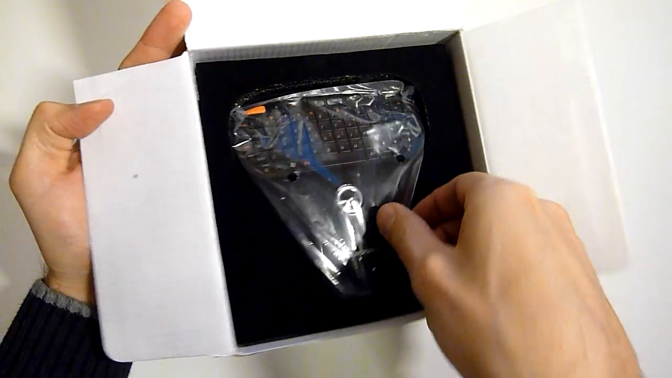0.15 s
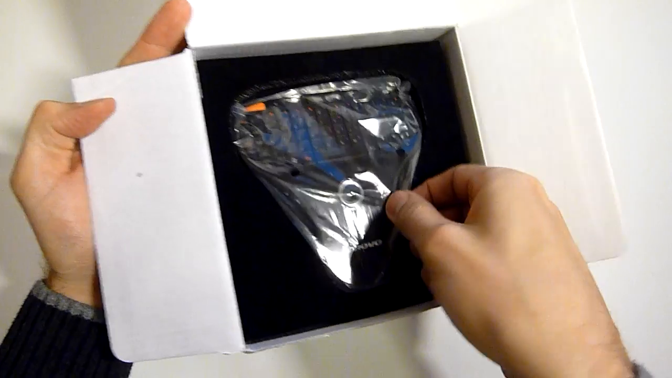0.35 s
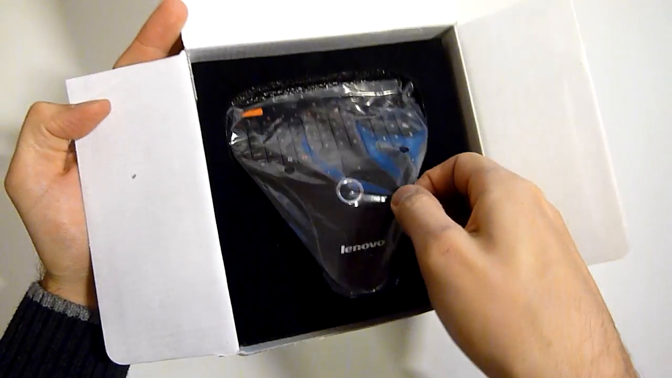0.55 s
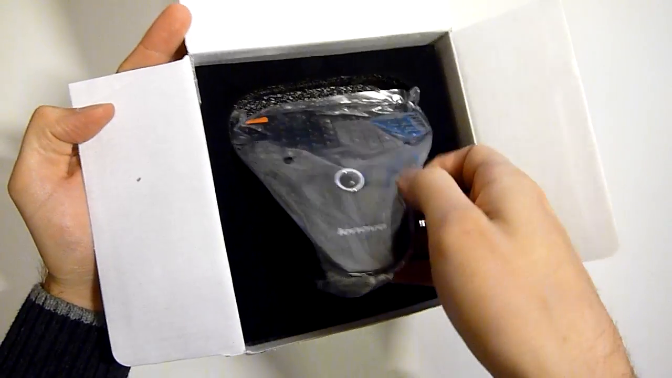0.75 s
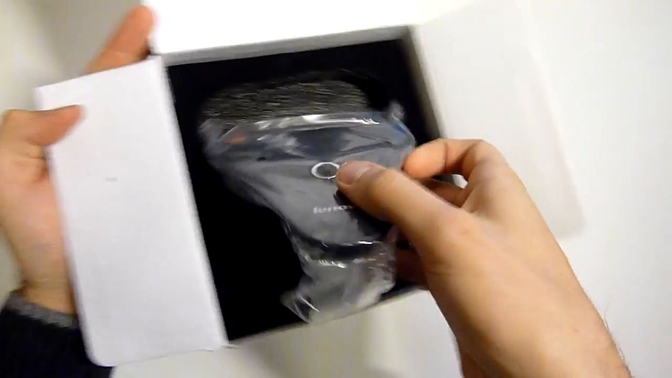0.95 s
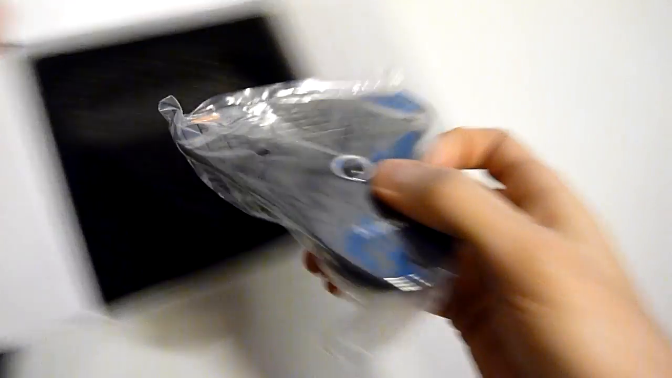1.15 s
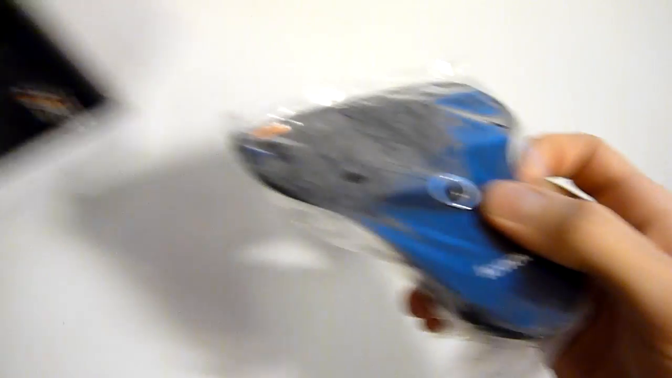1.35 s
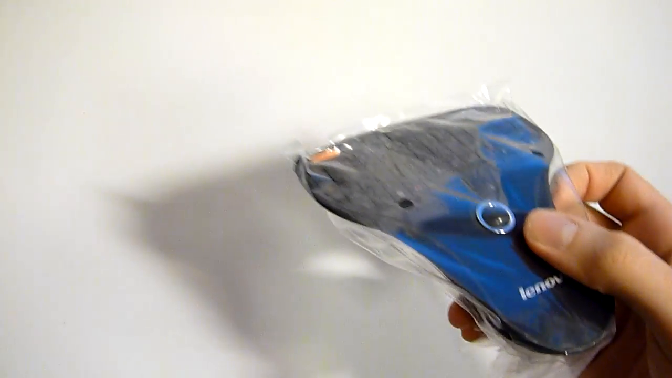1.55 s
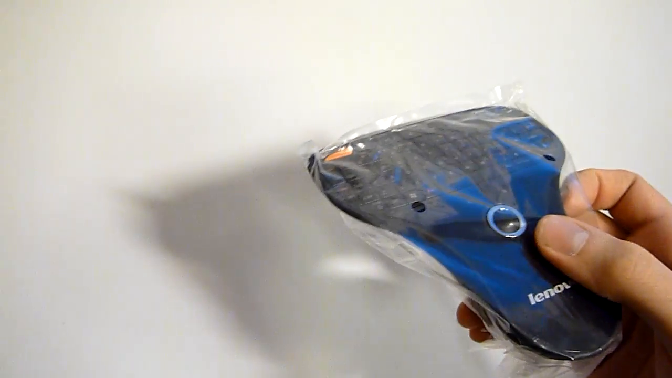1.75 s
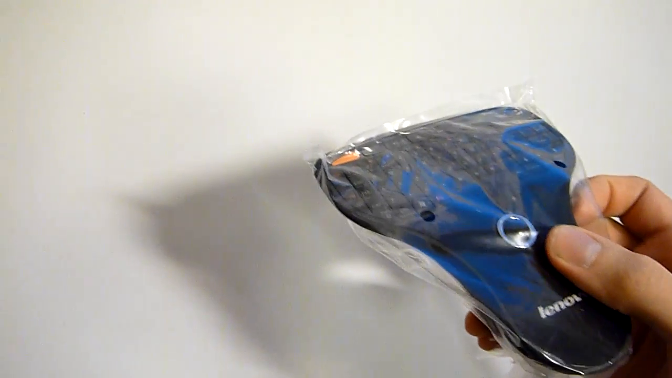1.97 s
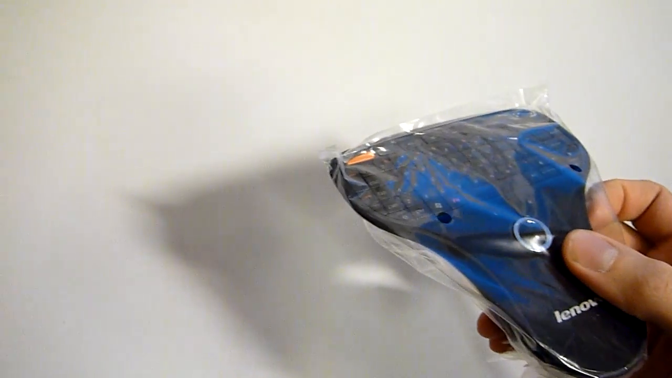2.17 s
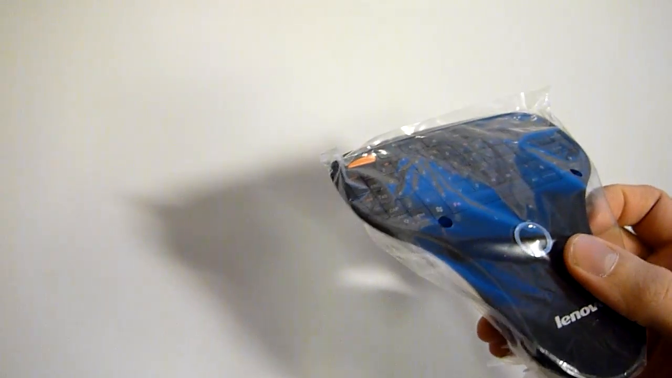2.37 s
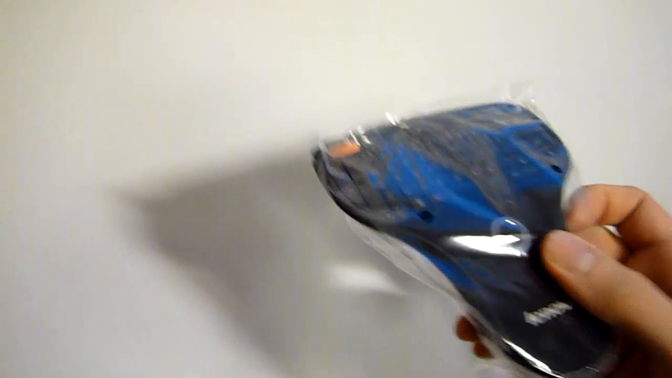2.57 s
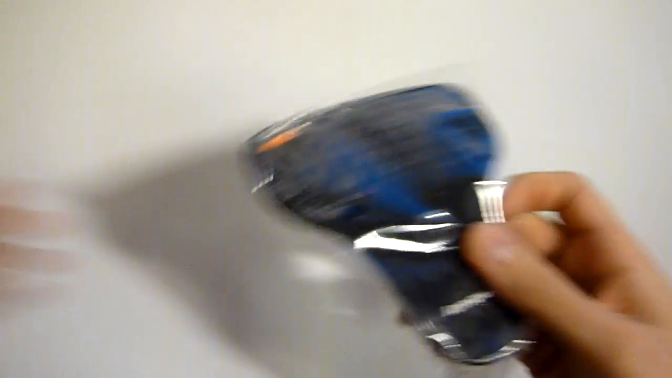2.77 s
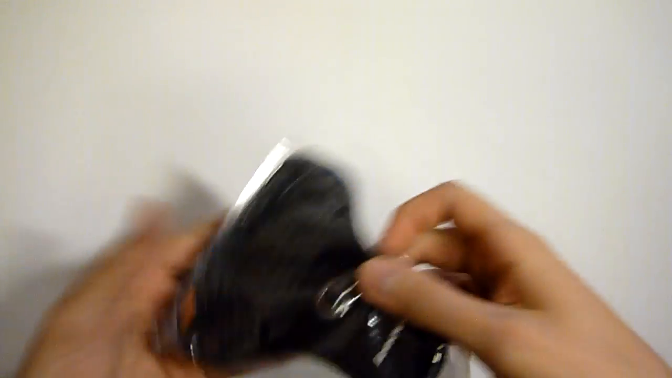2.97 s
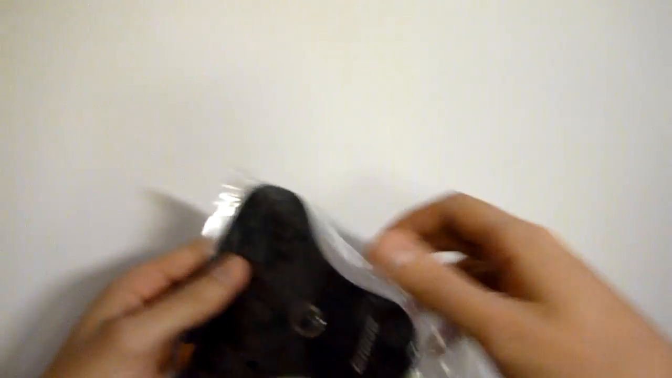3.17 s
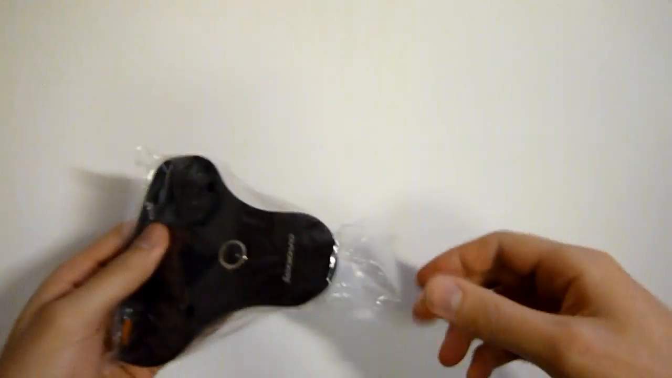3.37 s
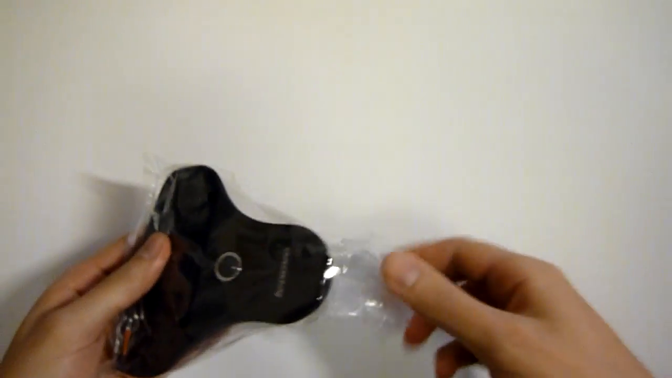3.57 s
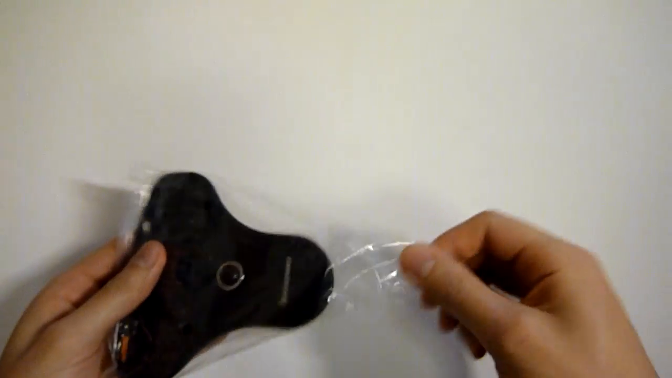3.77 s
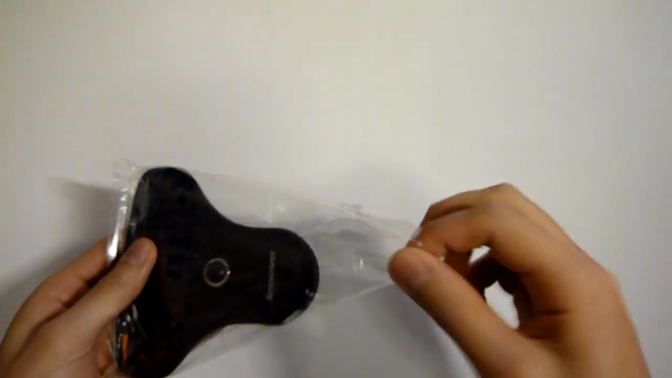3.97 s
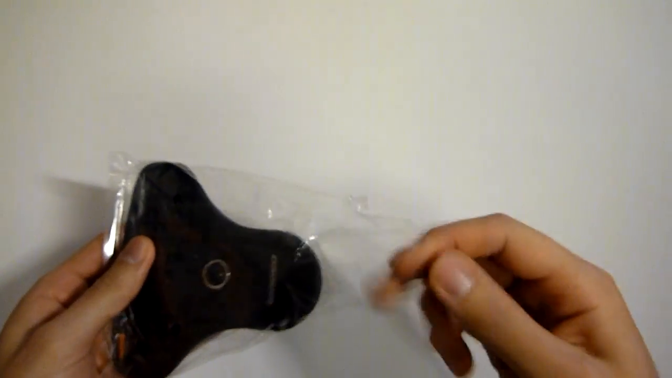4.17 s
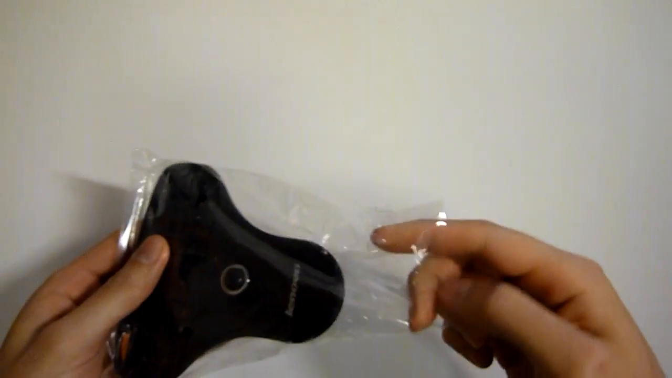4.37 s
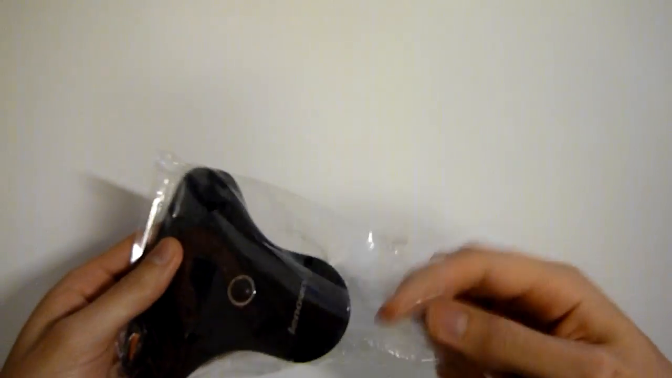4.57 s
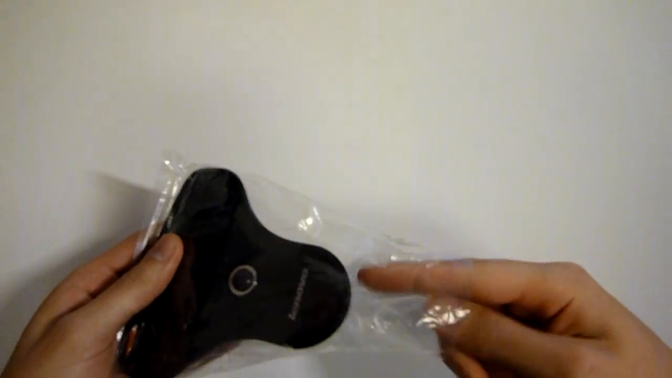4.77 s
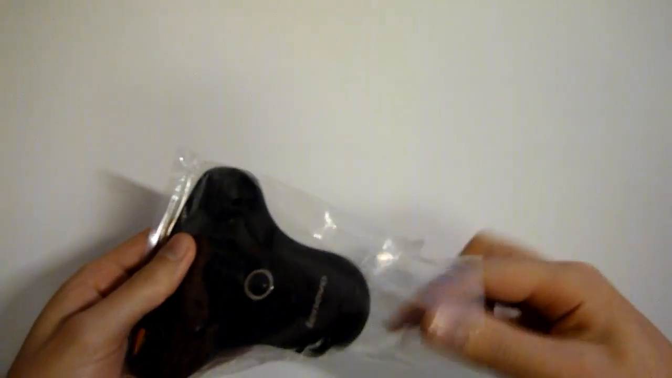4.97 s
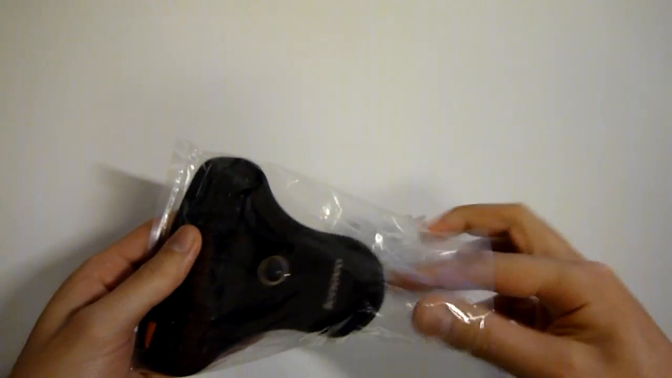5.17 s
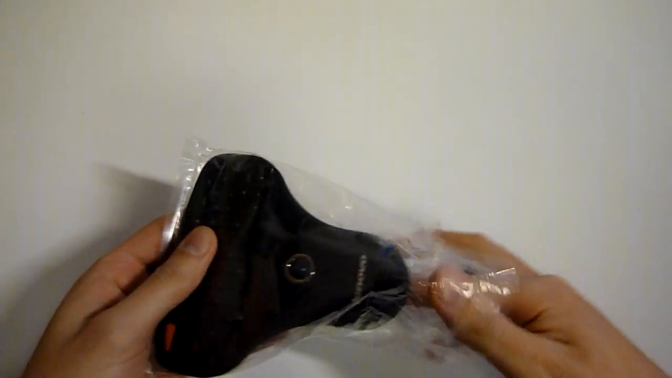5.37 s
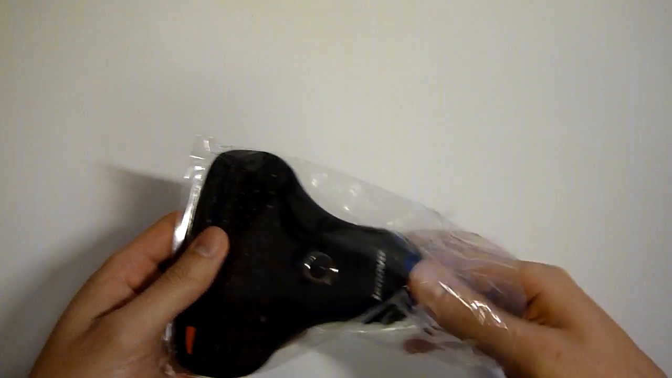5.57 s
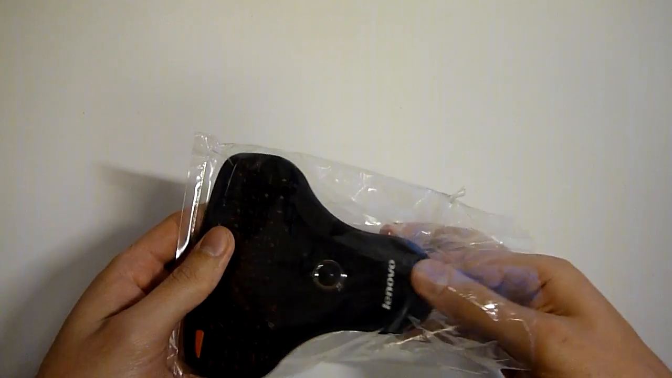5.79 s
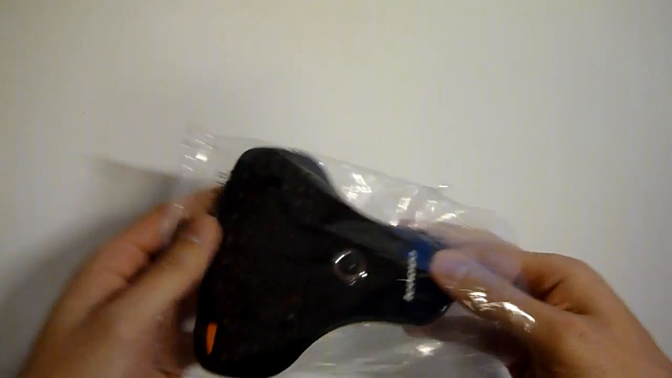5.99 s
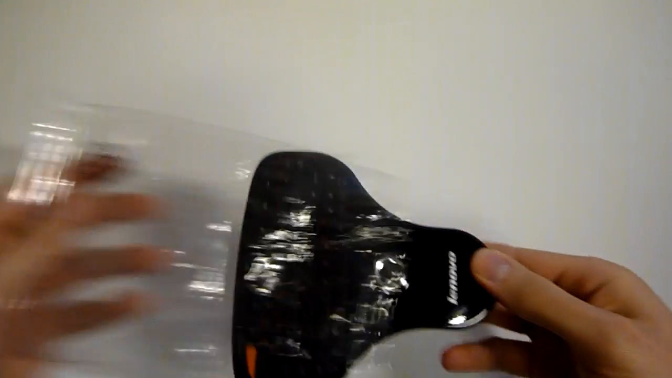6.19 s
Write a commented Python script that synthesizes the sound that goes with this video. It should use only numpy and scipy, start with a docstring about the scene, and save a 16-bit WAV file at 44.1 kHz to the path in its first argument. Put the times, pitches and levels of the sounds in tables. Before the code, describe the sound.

In a small quiet room, fingers grip a plastic-wrapped small keyboard in a cardboard box, making crisp crinkles and light scrapes. The rustling thins out, then the box lands with a hollow double knock and small bumps. After a near-quiet second, the bag is worked open with sharp, bright crackling bursts. Close stereo microphones, steady faint hiss.

```python
"""In a small, quiet room, a cardboard box is slid about and set down, and a small keyboard in a clear
plastic bag is lifted out and its bag worked open, at arm's length from two close microphones.
Each squeeze of the film is a swarm of tiny filtered noise bursts; single bursts are creases that snap
and two dull taps on the box. Knocks are noise thuds, rattles and ringing sines; scrapes and a brushing
hand are shaped noise. A short tail from the walls and a steady hiss complete the sound."""
import sys
import numpy as np
from scipy import signal
from scipy.fft import rfft, irfft, next_fast_len
from scipy.io import wavfile
from scipy.ndimage import uniform_filter1d

SR = 44100
rng = np.random.default_rng(int(sys.argv[2]) if len(sys.argv) > 2 else 0)


def wrap_up_sound(samples):
    """Save the sound to the file named by the first command line argument, as 16-bit audio."""
    columns = np.atleast_2d(samples).T
    # keep every value between -1 and 1, then stretch to whole-number steps
    tamed = np.clip(columns, -1, 1)
    steps = np.round(tamed * 32767).astype(np.int16)
    wavfile.write(sys.argv[1], SR, steps)


N = 274897  # length of the scene in samples


def undb(db):
    """Turn decibels into a gain."""
    return 10 ** (np.asarray(db) / 20)


def unit(x):
    """Scale a sound to an average (rms) level of 1."""
    return x / np.sqrt(np.mean(x ** 2) + 1e-20)


def freqs(size):
    """Frequencies in Hz of the bins of a real transform, never below 1."""
    return np.maximum(np.fft.rfftfreq(size, 1 / SR), 1)


def shape(points, f):
    """Read the level in dB at f from a curve of (f/Hz, level/dB) points."""
    hz, db = np.transpose(points)
    return np.interp(np.log(f), np.log(hz), db)


def colour(x, db):
    """Filter a sound to the given dB at each bin, with no sound before its cause (minimum phase)."""
    size = len(x)
    cepstrum = irfft(db * np.log(10) / 20, size)
    # folding the second half onto the first makes the filter act only forwards in time
    cepstrum[1:size // 2] *= 2
    cepstrum[size // 2 + 1:] = 0
    response = np.exp(rfft(cepstrum))
    return irfft(rfft(x) * response, size)


def paint(x, points):
    """Filter a long sound by a curve of (f/Hz, level/dB) points."""
    size = 2 * next_fast_len(len(x) // 2 + 2048)
    padded = np.pad(x, (0, size - len(x)))
    return colour(padded, shape(points, freqs(size)))[:len(x)]


def bump(f, hz, q, height_db):
    """A resonance standing out of a flat spectrum, in dB."""
    detuning = q * (f / hz - hz / f)
    return 10 * np.log10(1 + undb(height_db) ** 2 / (1 + detuning ** 2))


def add(track, s, sound):
    """Mix a sound into a track at time s in seconds."""
    i = max(int(s * SR), 0)
    part = sound[..., :max(N - i, 0)]
    track[..., i:i + part.shape[-1]] += part


def place(x, pan_db):
    """Make two channels, the left louder than the right by pan_db."""
    return x * undb(np.array([pan_db, -pan_db]).reshape(2, -1) / 2)


def from_left(x, pan_db=2.5):
    """The box lies to the left: louder there, and one sample sooner."""
    return place(np.array([x, np.roll(x, 1)]), pan_db)


def noise_pair(size, apart_hz):
    """Noise from all round: alike at both microphones in the bass, unrelated in the treble."""
    mid, side = rfft(rng.standard_normal((2, size)))
    alike = .97 / (1 + (freqs(size) / apart_hz) ** 2)
    mid = mid * np.sqrt((1 + alike) / 2)
    side = side * np.sqrt((1 - alike) / 2)
    return irfft(np.array([mid + side, mid - side]), size)


# tone of the still room and microphone hiss: (f/Hz, level/dB)
HISS_TONE = [(15, -34), (25, -20), (123, -8), (394, -4.5), (476, -8.5), (575, -6), (1040, -10.5),
             (1440, -13.5), (2350, -14), (14400, -25), (16000, -68)]


def floor(db=-51.0):
    """Steady air noise shared in part by both microphones, plus each microphone's own hiss."""
    air = noise_pair(2 * next_fast_len(N // 2 + 1), 650)[:, :N]
    noise = air + rng.standard_normal((2, N))
    return undb(db) * unit(np.array([paint(c, HISS_TONE) for c in noise]))


# cardboard sliding, or a fingertip dragging over the film:
# (middle t/s, half length t/s, level/dB at the middle, main resonance f/Hz)
SCRAPES = [(.005, 0.0095, -43.5, 1250), (0.102, 0.0174, -37, 1400), (0.196, 0.029, -37, 600),
           (2.002, .019, -34.5, 1136), (2.083, 0.032, -47.5, 1023), (2.373, 0.0217, -48, 970),
           (5.132, .004, -33.5, 1150), (5.392, 0.017, -39, 1270)]
# tone of the grain of sliding cardboard: (f/Hz, level/dB)
CARD_TONE = [(100, -39), (400, -11.5), (650, -6), (1000, -8.5), (1470, -3), (1950, -10.5), (2300, -6),
             (3000, -12), (6000, -14), (15000, -22)]


def scrapes(q=6, ring_db=11, size=8192):
    """The surface catches and slips in dense grains that swell and fade and excite one panel."""
    out, t, f = np.zeros(N), np.arange(size) / SR, freqs(size)
    for s, half_s, db, hz in SCRAPES:
        start = max(s - size / SR / 2, 0)
        # random single-sample slips, about 6000 a second
        slips = rng.standard_normal(size) * (rng.random(size) < 6000 / SR)
        grain = unit(colour(slips, shape(CARD_TONE, f) + bump(f, hz, q, ring_db)))
        swell = 1 / (1 + ((t + start - s) / half_s) ** 4)
        add(out, start, grain * undb(db) * swell)
    return out


# blows on the box: (start t/s, level/dB of the blow over 20 ms, softness cut-off f/Hz,
# t/s for the rattle to fall 60 dB (if negative it grows), level/dB of the table's ring)
KNOCKS = [(0.1095, -34.5, 695, 9.75, -48.5), (1.633, -19.5, 2700, 0.28, -35.5),
          (1.651, -27.5, 2610, 0.1, -50), (1.727, -39.5, 370, 0.25, -55), (1.752, -34, 237, -1.1, -44.5),
          (1.815, -40.5, 800, -12.28, -48), (1.945, -48, 600, -1, -57.5), (2.004, -42, 444, -1.5, -34)]
# notes the box rings with: (f/Hz, level/dB, t/s to fall 60 dB)
BOX_RINGS = [(230, -2.5, 0.081), (315.3, -16, 0.87), (419, 6, 0.049), (487.8, 0.5, 0.177),
             (536, 3.5, 0.084), (725, 6, 0.056), (771, 7, 0.089), (1140, -1, 0.12), (1247, 4.5, 0.055),
             (1550, -1.5, 0.06), (1827, 5, 0.054), (2180, 1, 0.088), (3547, -7, 0.09)]


def knocks(ring_db=-1, rattle_db=-5, thud_s=0.002, table_hz=157, table_t60=0.337, size=16384):
    """Each blow thuds, rattles the flaps and rings box and table; a softer contact dulls the blow."""
    out, t, f = np.zeros(N), np.arange(size) / SR, freqs(size)
    panel = shape([(100, -4.5), (200, -9.5), (400, -3), (800, 2), (1200, 0), (2200, -11),
                   (3700, -12), (4800, -20.5), (14000, -6)], f)
    table_fade = undb(-60 * t / table_t60) * (1 - np.exp(-t * table_hz))
    table = np.sin(2 * np.pi * table_hz * t) * table_fade
    # a small box radiates hardly any deep bass
    small_box = signal.butter(4, 110, "high", fs=SR, output="sos")
    for s, db, cut_hz, t60, table_db in KNOCKS:
        ring = np.zeros(size)
        for hz, level_db, life_s in BOX_RINGS:
            sign = rng.choice([-1, 1])
            ring += sign * undb(level_db - 60 * t / life_s) * np.sin(2 * np.pi * hz * t)
        rattle = colour(rng.standard_normal(size) * undb(-60 * t / t60), panel)
        thud = colour(rng.standard_normal(size) * np.exp(-t / thud_s), panel)
        blow = unit(thud) + undb(rattle_db) * unit(rattle) + undb(ring_db) * unit(ring)
        softness = -10 * np.log10(1 + (f / cut_hz) ** 4)
        blow = signal.sosfilt(small_box, colour(blow, softness))
        # give the blow the energy of 20 ms at its level
        blow *= undb(db) * np.sqrt(.02 * SR) / np.linalg.norm(blow)
        add(out, s, blow + undb(table_db) * table)
    return out


# the film is squeezed, pulled or jolted: (middle of the build-up t/s, hold t/s,
# level/dB of the crackle before weak squeezes are made weaker and the layers are balanced)
SQUEEZES = [(0.169, 0.084, -53), (0.36, 0.074, -48.5), (0.453, 0.053, -36), (0.594, 0.067, -39),
            (0.753, 0.092, -46.5), (0.844, 0.1183, -38), (1.09, 0.134, -64.5), (1.647, 0.009, -41),
            (1.83, 0.16, -56.5), (2.357, 0.01, -45.5), (2.691, 0.184, -57.5), (3.038, 0.052, -41),
            (3.14, 0.092, -44), (3.285, 0.0106, -50.5), (3.428, 0.013, -46), (3.578, 0.15, -37.5),
            (3.68, 0.0817, -29.5), (3.856, 0.021, -31), (3.92, 0.072, -42), (4.039, 0.16, -41.5),
            (4.151, 0.031, -24), (4.239, 0.08, -40), (4.418, 0.013, -28.5), (4.51, 0.024, -30),
            (4.59, .06, -36), (4.661, 0.0268, -29.5), (4.816, 0.12, -37), (4.938, 0.043, -33.5),
            (5.135, 0.251, -42), (5.253, 0.027, -33.5), (5.333, 0.047, -33.5), (5.451, 0.0589, -39),
            (5.55, .1, -47.5), (5.724, 0.084, -43), (5.875, 0.055, -48), (5.959, 0.09, -36),
            (6.074, 0.1434, -34)]
# each squeeze builds up, holds and dies away; the held bag never rests entirely
ATTACK_S, RELEASE_DB_PER_S, REST_DB = 0.036, 318.5, -65.5


def effort(step_s=0.002):
    """Level of the crackle in dB: squeezes with attack, hold and release, over the resting bag."""
    t = np.arange(0, N / SR, step_s)
    s, held_s, db = np.transpose(SQUEEZES)[:, :, None]
    attack = np.clip((t - s) / ATTACK_S + .5, 0, 1)
    release_db = RELEASE_DB_PER_S * np.clip(t - s - held_s, 0, 1)
    power = np.sum((attack * undb(db - release_db)) ** 2, axis=0) + undb(REST_DB) ** 2
    return np.interp(np.arange(N) / SR, t, 10 * np.log10(power))


def buckling(db):
    """Gain of the buckles: a film that is barely moved hardly buckles at all."""
    return undb(db) / (1 + undb(-57 - db) ** 2)


def swarm(per_s, spread_db, points, flutter_s, ring_hz, ring=2.92, q=12.8, size=512):
    """Tiny buckles of very unequal size and varied facet pitch; the level stays near 1."""
    t, f = np.arange(size) / SR, freqs(size)
    starts = np.flatnonzero(rng.random(N) < per_s / SR)
    sizes = undb(spread_db * np.minimum(rng.exponential(size=N), 3.5))
    # a stock of creases; each radiates a little differently to the two microphones
    mid, side = rfft(rng.standard_normal((2, size, size)) * np.exp(-t / flutter_s))
    side = side * f / (f + 6000)
    hz = ring_hz * 2 ** (0.714 * rng.standard_normal((size, 1)))
    facet = 1 + ring / (1 + 1j * q * (f / hz - hz / f))
    creases = irfft(np.array([mid + side, mid - side]) * facet, size)
    out = np.zeros((2, N + size))
    for i in starts:
        out[:, i:i + size] += sizes[i] * creases[:, i % size]
    out = np.array([paint(c[:N], points) for c in out])
    # even out the level over about 33 ms
    power = np.mean(out ** 2, axis=0)
    return out / np.sqrt(uniform_filter1d(power, SR // 30) + power.mean() / 100)


# flaps of the whole sheet: their level when the crackle is at USUAL_DB, and their dB per dB of crackle
USUAL_DB, FLAP_DB, FLAP_GROWTH = -40, -41.5, 0.785
# until the bag is lifted out, the box under it makes the flaps louder
LIFTED_S, BOX_BOOST_DB = 0.94, 4


def rustle():
    """Fingers work the film: fine crackle, and duller flaps of the whole sheet."""
    fine_db = effort()
    in_box = np.arange(N) / SR < LIFTED_S
    dull_db = FLAP_DB + FLAP_GROWTH * (fine_db - USUAL_DB) + BOX_BOOST_DB * in_box
    # tones of the two swarms: (f/Hz, level/dB)
    crisp = [(500, -57), (1300, -1), (2000, -2.0), (3500, -1), (5500, -4), (9000, -9.5), (15000, -24)]
    flap = [(40, -25), (100, -8.5), (180, -3.5), (400, 0.0), (760, 3), (1100, -6.5), (1700, -5.0),
            (2600, -10), (6000, -16)]
    crackle = swarm(440, 4.9, crisp, flutter_s=.0009, ring_hz=3800)
    flaps = swarm(400, 3.8, flap, flutter_s=.0016, ring_hz=1000)
    return undb(-1.4) * buckling(fine_db) * crackle + buckling(dull_db) * flaps


# lesser creases: number per second of holding, dB over the squeeze, spread either way in dB, middle Hz
STRAY_PER_S, STRAY_DB, STRAY_SPREAD_DB, STRAY_HZ = 18, 6, 3.5, 1980


def stray_creases():
    """Lesser creases give way at random during each hold, in rows laid out like SNAPS_AND_TAPS."""
    rows = []
    for s, held_s, db in SQUEEZES:
        count = round(held_s * STRAY_PER_S)  # at most 8 are used
        for when, size, pitch, body, edge in rng.uniform(-1, 1, (8, 5))[:count]:
            start = s + held_s * (when + 1) / 2
            level_db = db + STRAY_DB + STRAY_SPREAD_DB * size
            # the pitch lies up to two octaves either way
            rows.append((start, level_db, STRAY_HZ * 4 ** pitch, 8 * body, 8 * edge))
    return rows


# creases of the film that snap; the first two rows are dull taps on the box:
# (t/s, level/dB over 5 ms, ring f/Hz, body level/dB at 700 Hz and below,
# sharp edge level/dB at 11000 Hz and above)
SNAPS_AND_TAPS = [(0.259, -37, 905, 17, -10.5), (0.2967, -33, 790, 19, -13), (0.369, -19.5, 1189, 10, -1),
                  (0.3894, -29, 1368, 13.5, -7), (0.5132, -20.5, 3300, 15, 4.5), (0.5921, -30, 707, 6.5, 0),
                  (0.6427, -22.5, 1304, 13, 19), (0.6564, -16, 7000, 14.5, -1.5),
                  (0.7329, -33.5, 5700, 14, 8.5), (0.7686, -25, 1166, -12, -11.5), (0.919, -33, 9205, 4, 1),
                  (0.948, -30, 5230, 10, 12.5), (0.957, -26, 5920, 1, 6), (0.9709, -26.5, 1505, 7.5, -3.5),
                  (1.0901, -28, 630, -1, 2.5), (1.1541, -38, 1290, 4.5, -23), (1.291, -42, 707, 14, -6),
                  (1.4177, -35, 2250, -3.5, -8), (1.6028, -39, 5200, 14.5, 11),
                  (1.7276, -28.5, 1530, 15.5, -0.5), (2.4894, -44, 1780, 1, -4),
                  (2.6609, -42.5, 5300, -13, -9.5), (2.6881, -36, 3880, -34, -10.5),
                  (2.7105, -30, 4010, -19, 5), (2.803, -37, 556, 8.5, 0), (2.841, -35, 4180, 19, 6),
                  (2.8822, -31.5, 3650, 10, 8.5), (2.9559, -21, 4520, 5, 10), (3.1553, -24, 3830, 10.5, 1),
                  (3.2926, -33, 755, 2.5, 3), (3.653, -21, 3335, -16, 1.5), (3.761, -22, 745.3, -7, 3.5),
                  (3.8162, -18, 3130, 3, -6), (3.8529, -21.5, 543, -2, -12), (3.8889, -24, 4240, 6.5, 1.5),
                  (3.9561, -28.5, 9100, 1, -27.5), (4.0422, -27, 600, -5, 0), (4.077, -26, 646, -4, -13),
                  (4.2376, -23.5, 627, -1, -3), (4.269, -27, 1650, 9, 10), (4.4008, -29, 2270, 15, -5),
                  (4.5115, -20, 536, -5.5, -5.5), (4.6618, -20, 1847, -3.5, -2),
                  (4.8246, -22.5, 1638, -12, -5.5), (4.8424, -23.5, 625, 1.5, -5.5),
                  (4.9732, -30, 1640, 8, -9), (4.9817, -23.5, 2316, 15, 23), (5.1428, -27, 1350, -3, -7),
                  (5.169, -19.5, 1541, 0, -9), (5.2179, -29, 760, 0, 0.5), (5.265, -27.5, 5660, 3, -8),
                  (5.28, -23, 3155, 0, 0), (5.3478, -22.5, 1487, 6, 8.5),
                  (5.3674, -27.5, 2250, 10.5, -25.5), (5.4549, -21.5, 5170, -5, 9),
                  (5.4593, -24, 1520, -6, -1), (5.4832, -23.5, 1850, 11.5, 7),
                  (5.6176, -31.5, 1109, 3, -0.5), (5.7254, -25, 1590, 10.5, 5.5),
                  (5.87, -38.5, 1460, 9.5, -19), (6.0769, -21, 746, -5, -7),
                  (6.12, -18.5, 575.3, -20.5, -5.5), (6.1355, -21, 3300, 12, -3.5),
                  (6.1718, -17, 4000, -17, -7.5)]
# tone that the film radiates, also used for the two taps: (f/Hz, level/dB)
FILM_TONE = [(60, -29.5), (150, -17), (300, -10.5), (500, -9), (750, -0.5), (1150, -6), (2000, -4.5),
             (3500, -0.75), (5500, -2), (9000, -6.5), (14000, -13.5), (17000, -27.5)]


def snaps_and_taps(flutter=0.29, flutter_s=0.0019, q=5.8, ring_db=10, wander_db=0.6, flip_s=0.00047,
                   scatter_db=-6, scatter_s=0.01, size=2048):
    """A crease flips, the sheet flutters, a facet rings, hands and table scatter; taps are made alike."""
    lead = size // 16  # room for the flip to rise before its peak
    out, t, f = np.zeros((2, N)), (np.arange(size) - lead) / SR, freqs(size)
    after = np.maximum(t, 0)
    for s, db, hz, body_db, edge_db in SNAPS_AND_TAPS + stray_creases():
        length_s = flip_s * 2 ** rng.uniform(-1.34, 1)
        flip = unit(noise_pair(size, 22000) * np.exp(-np.abs(t) / length_s))
        waves = unit(noise_pair(size, 13800) * np.exp(-after / flutter_s) * (t > 0))
        scatter = unit(noise_pair(size, 8900) * np.exp(-after / scatter_s) * (t > 0))
        push = flip + flutter * waves + undb(scatter_db) * scatter
        balance = shape([(700, body_db), (3500, 0), (11000, edge_db)], f)
        tone = shape(FILM_TONE, f) + balance + bump(f, hz, q, ring_db)
        burst = unit(np.array([colour(c, tone) for c in push]))
        # give the burst the energy of 5 ms at its level
        burst *= undb(db) * np.sqrt(.005 * SR / size)
        add(out, s - lead / SR, place(burst, wander_db * rng.standard_normal()))
    return out


# tone of a hand brushing along the lid: (f/Hz, level/dB)
BRUSH_TONE = [(200, -8), (900, 2), (2500, -0.5), (5000, 5), (9000, 1), (15000, -1)]


def brush(s=2.264, half_s=0.156, db=-49.5):
    """Skin slides softly off the lid: noise that swells and fades around time s."""
    swell = np.exp(-((np.arange(N) / SR - s) / half_s) ** 2)
    return unit(paint(rng.standard_normal(N), BRUSH_TONE)) * swell * undb(db)


def room(x, db=-9, t60=0.21, size=16384, count=14):
    """The walls add a short tail of fading noise whose pattern shifts as the hands move."""
    t, out = np.arange(size) / SR, x.copy()
    fade = undb(-60 * t / t60) * (1 - np.exp(-t / 0.0034))
    step = N // count + 1
    # overlapping stretches, each with its own wall pattern, fade into one another
    for k in range(count + 1):
        i = np.arange(max((k - 1) * step, 0), min((k + 1) * step, N))
        share = np.cos(np.pi / 2 * (i / step - k))
        walls = unit(noise_pair(size, 5700) * fade) * undb(db) / np.sqrt(size)
        add(out, i[0] / SR, signal.oaconvolve(x[:, i] * share, walls, axes=1))
    return out


def scene():
    """Bag and box sound in the room, over its steady hiss."""
    box = from_left(knocks() + scrapes() + brush())
    bag_and_taps = snaps_and_taps() + rustle()
    return room(bag_and_taps + box) + floor()


def record(dry, top_hz=15900):
    """The left microphone is a little brighter than the right; both lose the treble above top_hz."""
    # tone of the left microphone: (f/Hz, level/dB); the right is its opposite
    left = np.array([(100, -0.092), (300, -0.51), (1000, -0.26), (4000, 0.87), (14000, 0.72)])
    right = left * [1, -1]
    heard = np.array([paint(dry[0], left), paint(dry[1], right)])
    top_cut = signal.ellip(10, .2, 70, top_hz, fs=SR, output="sos")
    return signal.sosfilt(top_cut, heard)


dry = scene()
out = record(dry)
wrap_up_sound(out)
```